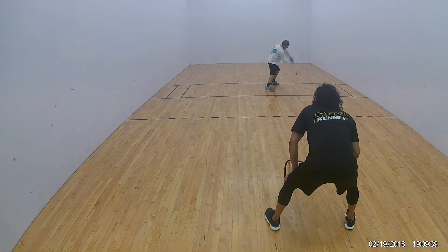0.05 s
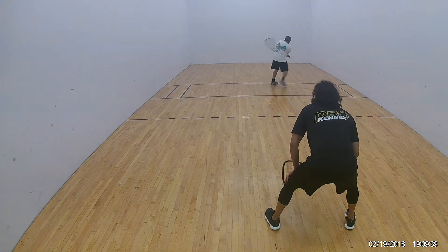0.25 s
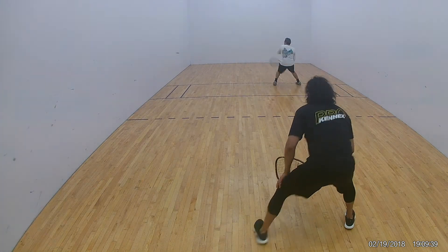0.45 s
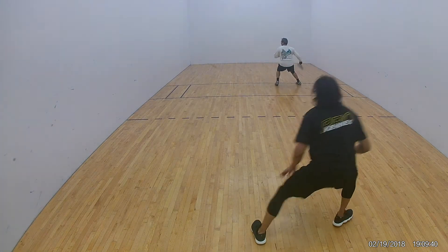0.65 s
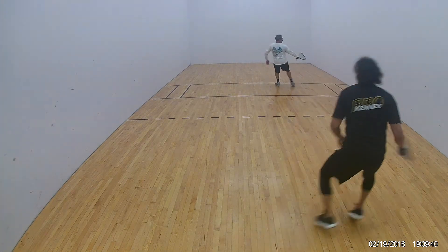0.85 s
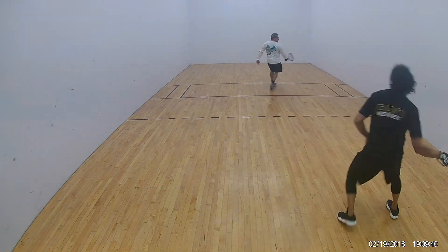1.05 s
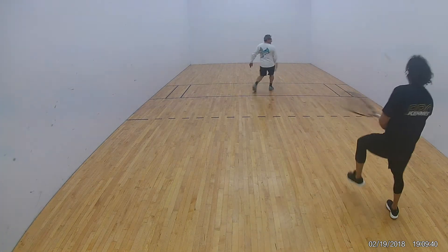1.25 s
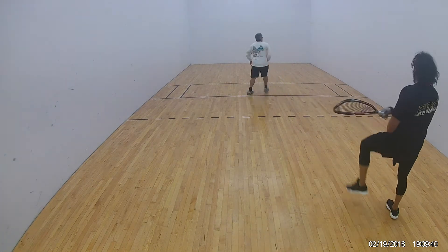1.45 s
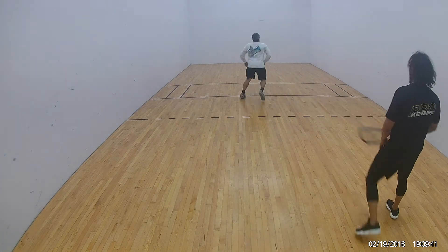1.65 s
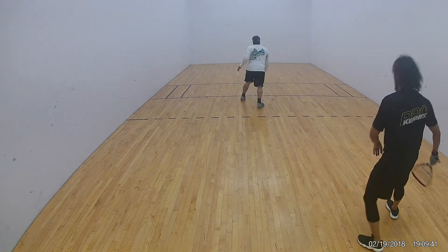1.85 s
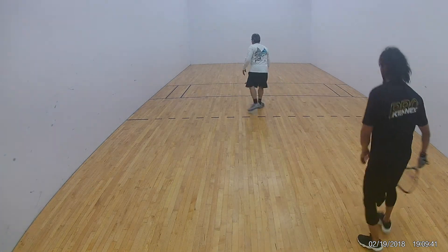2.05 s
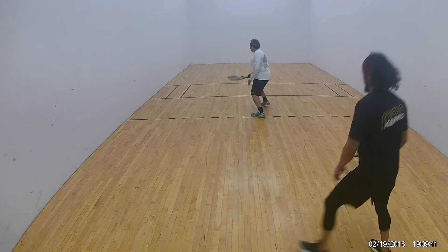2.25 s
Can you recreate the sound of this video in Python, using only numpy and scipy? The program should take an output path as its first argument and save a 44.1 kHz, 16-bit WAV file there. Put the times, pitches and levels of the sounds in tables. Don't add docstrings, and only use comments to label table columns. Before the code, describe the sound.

Racquetball hits boom through a hard-walled court, with brief shoe squeaks and thudding footsteps

```python
import sys
import numpy as np
from scipy import signal
from scipy.io import wavfile
from scipy.ndimage import uniform_filter1d

SR = 44100
rng = np.random.default_rng(int(sys.argv[2]) if len(sys.argv) > 2 else 0)


def elevation(decibels):
    levels = np.asarray(decibels, float)
    return 10 ** (levels / 20)


def transcribe(u):
    v = np.clip(np.atleast_2d(u).T, -1, 1)
    q = np.round(v * 32767).astype(np.int16)
    wavfile.write(sys.argv[1], SR, q)


N = 101429


def evened(x):
    return x / np.sqrt(np.mean(x ** 2) + 1e-20)


def read(points, hz):
    f, value = np.transpose(points)
    return np.interp(np.log(hz + 1), np.log(f + 1), value)


def add(mix, s, sound):
    part = mix[round(s * SR):][:len(sound)]
    part += sound[:len(part)]


def resonate(x, hz, width):
    turn = np.exp(2j * np.pi * hz * np.arange(len(x)) / SR)
    r = np.exp(-np.pi * width / SR)
    return 2 * (turn * signal.lfilter([1 - r], [1, -r], x / turn)).real


def shaped(db_of):
    patch_db = -0.3
    frames, hz = N // 128 + 5, np.fft.rfftfreq(512, 1 / SR)
    a, b, patch = rng.standard_normal((frames, 257, 3)).T
    patch = uniform_filter1d(patch, size=5, axis=0)
    patch = evened(uniform_filter1d(patch, size=12, axis=1))
    s = np.arange(frames) * 128 / SR
    z = (a + 1j * b) * elevation(db_of(hz[:, None], s) + patch_db * patch)
    return signal.istft(z, nperseg=512, noverlap=384)[1][:N]


def old_echo():
    # f/Hz, level/dB per Hz
    old_tail = [(40, -36.5), (300, -23.5), (800, -24), (1500, -21), (1950, -31), (2200, -40.5),
                (4500, -52.5), (9000, -77.5)]
    level_db, drift_db_per_s = -48, -0.5
    t = np.arange(N) / SR
    return elevation(level_db + drift_db_per_s * t) * evened(shaped(lambda hz, s: read(old_tail, hz) + 0 * s))


def building_hum():
    hum_hz = [30.3, 464, 554.5, 1486]
    # level/dB, waver/Hz, drift/(dB per s)
    hum = [(-68.5, 3, 2), (-50, 2.5, -6.5), (-55.5, 2.5, 1.5), (-57.5, 8, -14)]
    t = np.arange(N) / SR
    out = np.zeros(N)
    for hz, (db, waver, drift) in zip(hum_hz, hum):
        noise = resonate(resonate(rng.standard_normal(N), hz, waver), hz, waver)
        tone = np.sin(2 * np.pi * hz * t) + 0.11 * evened(noise)
        out = out + elevation(db + drift * t) * evened(tone)
    return out


def rumble():
    return elevation(-65) * evened(resonate(rng.standard_normal(N), 60, 44))


def court():
    # f/Hz, t60/s
    decay = [(100, 4.7), (400, 6.15), (1200, 5.35), (2200, 4.89), (4000, 4.04), (6000, 1.84), (9000, 1.1),
             (15000, 0.55)]
    build_s, flutter_s, flutter_depth, flutter_fade_s = 0.0025, 0.051, 0.067, .2
    early_db, early_s = 4.5, 0.012
    t = np.arange(N) / SR
    tail = shaped(lambda hz, s: -60 * s / np.maximum(read(decay, hz), .1))
    throb = np.exp(-t / flutter_fade_s) * np.sin(2 * np.pi * t / flutter_s - np.pi / 4)
    tail = tail * (1 - flutter_depth * throb)
    tail = tail * elevation(early_db * np.exp(-t / early_s)) * (1 - np.exp(-t / build_s))
    return tail / np.linalg.norm(tail)


def heard(s, sound, direct_db, wet_db, tail, arrival=np.asarray):
    out = np.zeros(N)
    add(out, s, elevation(direct_db) * arrival(sound))
    add(out, s, elevation(wet_db) * signal.fftconvolve(sound, tail))
    return out


def microphone(x):
    # f/Hz, level/dB
    colour = [(40, -19.5), (300, -11), (800, -7.5), (1900, -4.5), (2600, -21.5), (5000, -25), (7500, -42.5),
              (15000, -59)]
    # f/Hz, width/Hz, level/dB
    case = [(1200, 450, 3), (1748, 170, 4), (2440, 83, 6), (586, 160, -5.5), (3070, 570, 6.5),
            (3683, 200, -10.5), (3880, 690, 5), (4490, 66, 1), (5490, 270, -3), (5985, 380, 9.5),
            (8000, 400, -7.5), (8550, 400, 1)]
    hz = np.fft.rfftfreq(4096, 1 / SR)
    db = read(colour, hz) + sum(d / (1 + (2 * (hz - f) / w) ** 2) for f, w, d in case)
    log = np.log(elevation(np.r_[db, db[-2:0:-1]]))
    taps = np.fft.ifft(np.exp(log - 1j * signal.hilbert(log).imag)).real[:2048]
    return signal.fftconvolve(x, taps)[:N]


def footfall(db, hz):
    rise_s = 0.029
    u = np.arange(12000) / SR / rise_s
    boards = resonate(resonate(rng.standard_normal(12000), hz, 38), hz, 38)
    return elevation(db + 5) * u * np.exp(-u) * evened(boards)


def footfalls(mix):
    # t/s, level/dB, f/Hz
    steps = [
        (0.328, -52.5, 92),
        (0.449, -42, 184),
        (1.031, -56.5, 139),
        (1.391, -56.5, 127),
        (1.73, -53, 109),
        (2.1, -57.5, 71),
        (2.198, -47, 110),
    ]
    for s, db, hz in steps:
        add(mix, s, footfall(db, hz))


def scuff(length, db, hz, width):
    grains = rng.standard_normal(6000) * rng.exponential(1, 6000)
    slide = evened(resonate(resonate(grains, hz, width), hz, width))
    t = np.arange(0, min(length, .13), 1 / SR)
    return elevation(db) * np.sin(np.pi * (t / length) ** .7) * slide[:len(t)]


def scuffs(mix):
    # t/s, length/s, level/dB, centre f/Hz, width/Hz
    slides = [
        (0.321, 0.076, -78.5, 9800, 2400),
        (0.951, .03, -80.5, 10000, 1500),
        (1.403, 0.03, -83, 9500, 4000),
        (1.412, .12, -70, 5670, 1200),
    ]
    for s, *slide in slides:
        add(mix, s, scuff(*slide))


def returning(sound):
    trip_s = .0725
    end_walls_db = [-4, -9.5, -14]
    out = np.r_[sound, np.zeros(SR // 4)]
    for k, db in enumerate(end_walls_db):
        add(out, (k + 1) * trip_s, elevation(db) * sound)
    return out


def squeak(length, db, first_hz, last_hz):
    overtones_db = [-2.5, -11.5, -13]
    wobble_depth, chatter_depth = 0.011, 0.17
    t = np.arange(0, length, 1 / SR)
    wobble = evened(uniform_filter1d(rng.standard_normal(4000), size=90))[:len(t)]
    chatter = evened(uniform_filter1d(rng.standard_normal(4000), size=40))[:len(t)]
    glide_hz = first_hz + (last_hz - first_hz) * t / length
    turns = np.cumsum(glide_hz * (1 + wobble_depth * wobble)) / SR
    tone = sum(elevation(d) * np.sin(2 * np.pi * (k + 1) * turns) for k, d in enumerate(overtones_db))
    swell = abs(np.sin(np.pi * t / length)) ** 0.48
    return elevation(db + 19) * swell * (1 + chatter_depth * chatter) * tone


def squeaks(tails):
    # t/s, length/s, level/dB, first f/Hz, last f/Hz
    slips = [
        (.455, 0.025, -32.5, 4400, 3870),
        (.484, 0.033, -36, 4148, 4403),
        (1.649, .021, -32, 4410, 4100),
        (1.664, 0.018, -31.5, 3920, 3640),
        (1.676, 0.015, -36.5, 4903, 4550),
        (1.688, 0.02, -32.5, 3904, 4360),
    ]
    wet_db = -8.5
    return sum(heard(s, squeak(*slip), 0, wet_db + 10, tails[k % 6], returning)
               for k, (s, *slip) in enumerate(slips))


def tick(db, hz):
    t60_s, snap_share = .016, 0.24
    t = np.arange(600) / SR
    snap = snap_share * rng.standard_normal(600) * elevation(-120 * t / t60_s)
    ring = elevation(-60 * t / t60_s) * np.sin(2 * np.pi * hz * t)
    return elevation(db + 31) * (snap + ring)


def ticks(tails):
    tick_ms = [189, 217, 318, 330, 948, 957, 1221.5, 1423, 1721]
    tick_hz = [4600, 8700, 8650, 8650, 10300, 10500, 7000, 9500, 6000]
    # level/dB, echo level/dB
    clicks = [(-50, -18), (-61, -18), (-42.5, -13.5), (-45.5, -16.5), (-47.5, -21.5), (-44, -19.5),
              (-50, -8.5), (-62, -4.5), (-65, -12.5)]
    return sum(heard(ms / 1000, tick(db, hz), 0, tail_db, tails[k % 6])
               for k, (ms, hz, (db, tail_db)) in enumerate(zip(tick_ms, tick_hz, clicks)))


def smeared(sound):
    smear_s = 0.0042
    u = np.arange(1500) / SR / smear_s
    cluster = rng.standard_normal(1500) * np.sqrt(u) * np.exp(-u)
    return np.convolve(sound, cluster / np.linalg.norm(cluster))


def blow(ring_hz, db, ring_db, t60):
    contact_s, blows_db = 0.00014, -11
    t = np.arange(6000) / SR
    u = t / contact_s
    push = (1 - u) * np.exp(-u)
    ring = elevation(-60 * t / max(t60, .004)) * np.sin(2 * np.pi * ring_hz * t)
    both = push / np.linalg.norm(push) + elevation(ring_db) * ring / np.linalg.norm(ring)
    return elevation(blows_db + db + 29.5) * both


def blows(tails):
    blow_ms = [186.5, 217, 226, 243, 316.5, 334, 362.5, 371.5, 390, 945, 1221, 1335, 1423, 1481, 1721,
               1746.5, 1764, 1792]
    ring_hz = [950, 1180, 3200, 1850, 1800, 1600, 1280, 1300, 1250, 1500, 1150, 800, 1000, 900, 945, 905,
               1100, 930]
    # level/dB, ring level/dB, ring t60/s, direct sound level/dB
    strikes = [(-5.5, -7, 0.032, -5), (-3.5, -4.5, 0.027, 2.5), (-12, 4, 0.01, 6), (-13, 3, 0.057, 4),
               (2.5, -16.5, .032, -0.5), (-9.5, 1.5, 0.038, 7), (-16, 6.5, 0.017, 14),
               (-9.5, 4, 0.017, -3.5), (-10, -1.5, 0.018, 7.5), (-27, -12.5, 0.017, 9.5),
               (-12.5, -0.5, 0.011, 0), (-14, -8, 0.056, -3.5), (-14, -0.5, 0.03, 1),
               (-24, -10.5, 0.014, -6), (-14, 4, 0.057, -2), (-22, 10, 0.061, 3), (-23, 3.5, 0.025, 10.5),
               (-22.5, 3, 0.039, 8.5)]
    return sum(heard(ms / 1000, blow(hz, db, ring_db, t60), direct_db - 8, 0, tails[k % 6], smeared)
               for k, (ms, hz, (db, ring_db, t60, direct_db)) in enumerate(zip(blow_ms, ring_hz, strikes)))


def scene():
    tails = [court() for _ in range(6)]
    play = blows(tails) + ticks(tails) + squeaks(tails)
    out = microphone(play) + old_echo() + building_hum() + rumble()
    scuffs(out)
    footfalls(out)
    return out[None]


def top_cut(x):
    return signal.sosfilt(signal.butter(12, 15900, fs=SR, output="sos"), x)


def record(dry):
    fade = np.minimum(np.arange(N, 0, -1) / 150, 1)
    hiss = elevation(-78.5) * rng.standard_normal(dry.shape)
    return top_cut(dry * fade + hiss)


dry = scene()
out = record(dry)
transcribe(out)
```